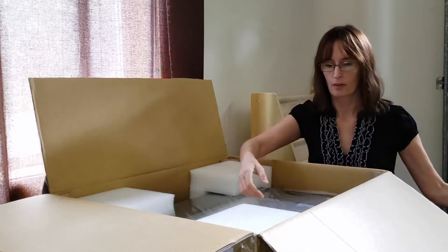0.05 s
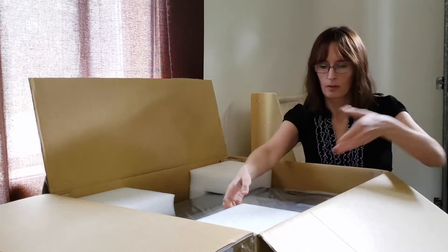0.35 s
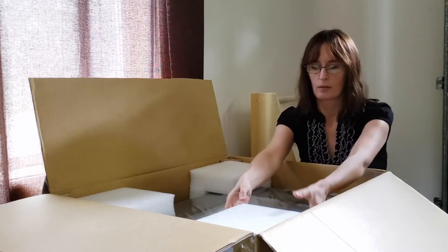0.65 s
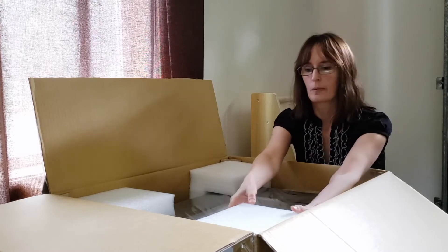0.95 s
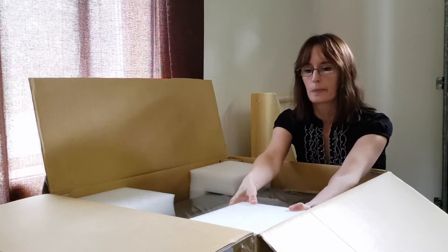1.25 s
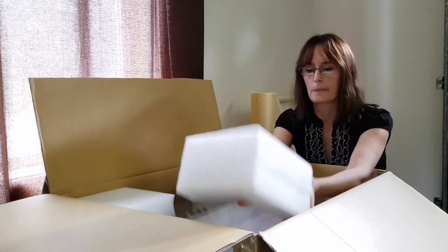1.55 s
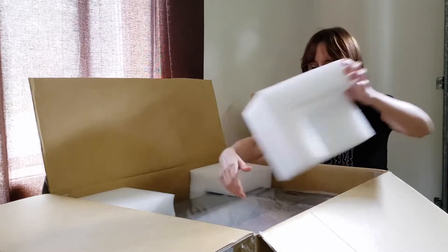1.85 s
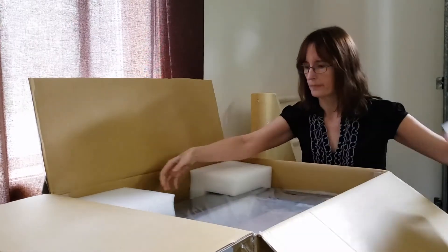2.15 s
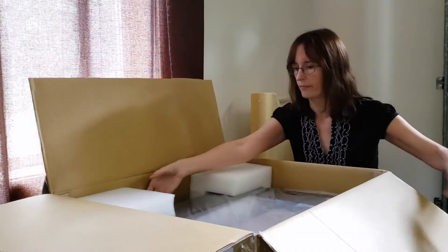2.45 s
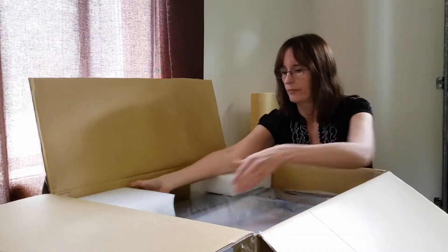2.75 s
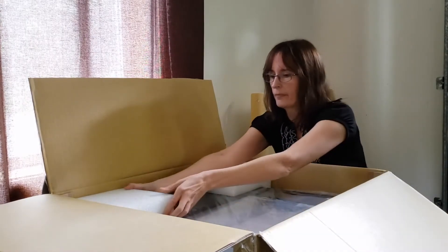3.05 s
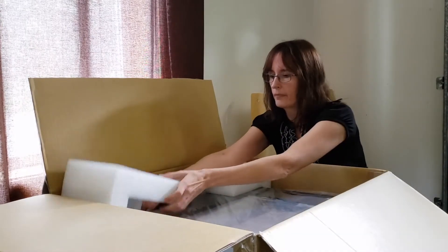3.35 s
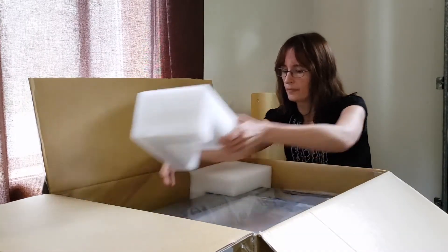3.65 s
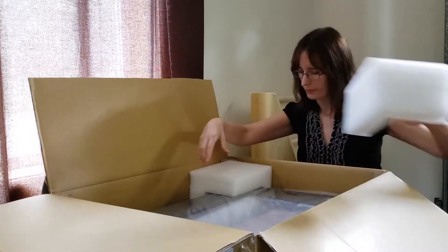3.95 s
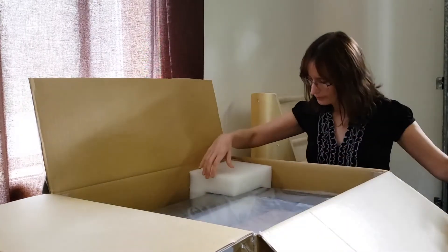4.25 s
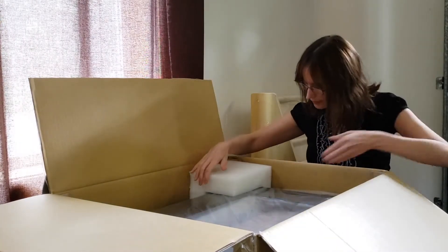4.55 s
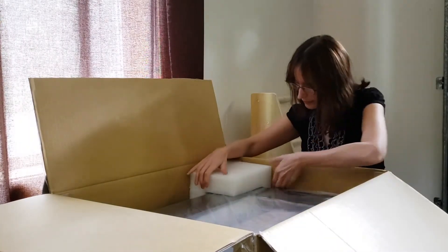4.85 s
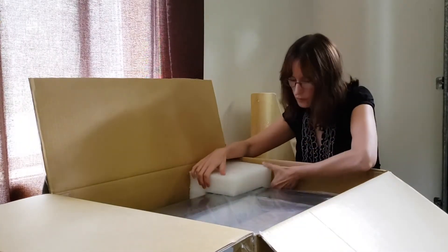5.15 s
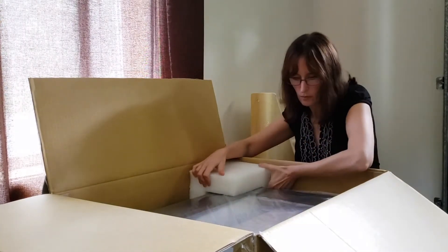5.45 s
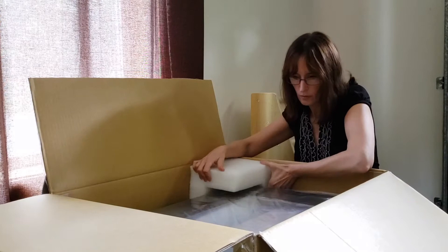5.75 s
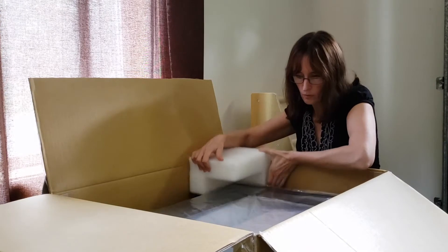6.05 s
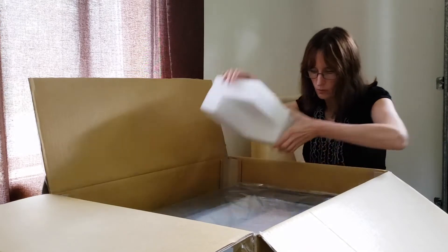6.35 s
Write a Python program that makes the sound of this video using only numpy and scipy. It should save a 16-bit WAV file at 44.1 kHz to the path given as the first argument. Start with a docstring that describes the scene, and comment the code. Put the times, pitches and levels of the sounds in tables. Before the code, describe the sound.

In a small room, a light block lands with a few dull thumps. Then, close to the microphones, foam scrapes along cardboard and comes loose with a hollow boom, followed by another thud on the floor. A second rasping pull leads to a run of soft knocks, scuffs and bounces, and a third stretch of rubbing ends it. Faint hand brushes and a low room drone lie underneath.

```python
"""Unpacking foam from a cardboard box

A small room, heard close to a big box through a pair of closely spaced microphones. Foam blocks are worked
out in a few strokes a pull: a dense crackle of tiny slips along the cardboard, with short scuffs where the
foam catches. Blocks land and bounce on the floor with dull thumps, and the box panels boom and rumble.
Behind it all lies the room tone, a faint drone and hiss."""
import sys
import numpy as np
from scipy import signal
from scipy.fft import rfft, irfft
from scipy.io import wavfile
from scipy.ndimage import uniform_filter1d

SR = 44100
rng = np.random.default_rng(int(sys.argv[2]) if len(sys.argv) > 2 else 0)


def wav_out(sig):
    """Save sig, one row per channel (or a flat mono array), as 16-bit PCM at SR to the path in sys.argv[1]."""
    wavfile.write(sys.argv[1], SR, np.round(np.clip(np.atleast_2d(sig).T, -1, 1) * 32767).astype(np.int16))


N = 291192
TIME = np.arange(N) / SR

# Levels in the tables are relative: each source sets its own gain in the mix.
# rubbing strokes, foam along cardboard and two light, fizzy brushes of a hand: start/s, rise/s, hold/s,
# t60/s, level/dB, body/dB re level, fizz/dB re level, body f/Hz, rasp f/Hz
RUBBING_STROKES = [ (0.0, 0.00078, 0.0024, 0.15, -29, -12.5, -5.5, 726, 2400),
                   (0.52, 0.023, 0.046, .2, -48.5, 3, -5, 520, 2010),
                   (0.848, 0.027, 0.018, 0.34, -38.5, 4, -3.5, 716, 1400),
                   (1.004, .03, .01, 0.17, -48, -19, -7, 440, 2000),
                   (1.156, 0.037, 0.087, 0.29, -20.5, -6, -14, 845, 1630),
                   (1.235, .065, .02, 0.32, -17.5, -6.5, -10, 840, 2050),
                   (1.316, 0.036, 0.025, 0.24, -18, -13.5, -9.5, 860, 2500),
                   (1.414, 0.025, 0.0089, 0.26, -21.5, -6.5, -6, 885, 1720),
                   (1.546, 0.039, 0.01, 0.15, -33, -11, -1.5, 900, 1900),
                   (2.292, 0.043, 0.0036, 0.28, -38, 1, 9, 1030, 1910),
                   (3.076, .022, 0.025, 0.45, -22, -1, -7, 910, 2000),
                   (3.147, 0.043, 0.064, 0.33, -27.5, -5, 0, 780, 1790),
                   (3.239, 0.034, 0.015, 0.43, -23.5, -5, -4.5, 920, 1800),
                   (3.431, 0.018, 0.0055, 0.28, -28.5, -2.5, -5.5, 680, 2270),
                   (3.476, 0.032, 0.012, 0.34, -30, -1, -1.5, 910, 1600),
                   (4.061, 0.076, 0.039, 0.23, -38, -0.5, 5, 820, 2730),
                   (5.588, 0.068, 0.05, 0.34, -22.5, 0.5, -5.5, 945, 1670),
                   (5.765, 0.1, 0.093, .3, -33.5, 1, -3, 850, 1550),
                   (5.863, 0.098, 0.027, .3, -18.5, -3, -6.5, 945, 1850),
                   (5.974, 0.032, 0.041, 0.38, -18, -2.5, -5, 620, 1810),
                   (6.081, 0.032, 0.011, 0.24, -21.5, -10, 1, 990, 1860),
                   (6.272, 0.03, 0.061, 0.32, -32, -9.5, 0.5, 960, 1950),
                   (6.332, 0.025, 0.0037, 0.18, -28, -3, 0, 970, 2700)]
# light brushes of hands and sleeves: middle t/s, length/s, level/dB
HAND_BRUSHES = [(0.72, 0.57, -59), (1.07, 0.39, -51.5), (2.24, 0.14, -48), (2.69, 0.23, -48),
                (3.02, .17, -47), (3.89, 0.061, -49.5), (3.98, 0.065, -48.5), (4.31, 0.25, -56.5),
                (4.49, 0.16, -53.5), (5.5, 0.17, -56.5), (5.6, .08, -48), (6.59, 0.14, -53.5)]
# spectrum of foam on cardboard: f/Hz, level/dB
FOAM_SPECTRUM = [(150, -13.5), (250, -8), (436, -6.5), (528, -6), (566, -4.5), (845, -1.5), (1470, -4),
                 (1670, -5.5), (2050, -7), (6820, -12.5), (7840, -10.5), (9010, -18.5), (11500, -16),
                 (15200, -21.5), (16000, -24)]
# sliding foam catches and lets go, and a hand brushes past at 2.33 s: t/s, level/dB, t60/s, tilt/(dB per
# octave), ring f/Hz, ring/dB
CATCHES = [(0.258, -13.5, 0.044, -3.5, 1010, 2), (0.265, -8, 0.029, -4, 3900, 16),
           (0.274, -17.5, 0.024, -7, 2300, 7), (1.249, -17.5, 0.052, -1.5, 6400, 10),
           (1.442, -16, 0.069, 1.5, 2200, 1), (2.134, -38, 0.025, 0.5, 5100, 6),
           (2.33, -40.5, 0.17, 0, 1010, 19), (3.076, -23, 0.094, 2, 5040, -4),
           (3.085, -14, 0.14, 2.2, 3000, 3.5), (3.268, -25.5, .15, 1, 2400, 7),
           (3.362, -17.5, 0.067, -1, 1730, 0), (3.575, -23.5, 0.11, 1.5, 2600, 2.5),
           (3.945, -34, .057, 7, 9250, 12), (3.971, -39, 0.15, -6, 967, 28),
           (4.53, -28.5, 0.046, 1.5, 6700, 8.5), (4.565, -13.5, 0.033, 3.5, 3670, 14),
           (4.706, -24, 0.35, 1, 1390, 15), (4.921, -17.5, 0.076, -2.5, 3000, 3),
           (5.209, -41.5, 0.72, -1.5, 2440, -1), (5.8, -26, .02, 0, 5000, -3),
           (6.128, -25, .04, 6, 2600, 3), (6.280, -25.5, .045, 1, 3000, 0),
           (6.362, -21, 0.042, 7, 3630, 17)]
# blocks and hands strike floor and box: t/s, slap level/dB, slap f/Hz, rise/cycles, room/dB re slap,
# low push level/dB, scuff level/dB, scuff t60/s, scuff tilt/(dB per octave)
BLOWS = [ (0.264, -10, 450, 0.27, 3, -9.5, -10, 0.038, -2), (0.279, 0, 497, 0.6, 6.5, -11.5, -30, 0.14, -9),
         (0.368, -11.5, 473, 0.89, -11, -38, -37, 0.11, -7),
         (0.455, -27, 440, 0.56, 10.5, -21, -34, 0.15, -2.5), (0.606, -13, 287, 0.39, 4, -33, -39.5, .2, 1),
         (0.645, -24, 290, 0.86, -3, -40, -46, .1, 1), (0.970, -29.5, 350, 0.7, 12, -37, -30, 0.17, -1),
         (1.026, -31, 334, 0.76, 9.5, -37, -51, .1, -1), (1.304, -21, 200, 0.29, 5, -36, -33, .1, -1),
         (1.617, -21, 334, 0.46, 8, -10.5, -22, 0.18, 0.5), (1.638, -18, 454, 0.88, 3, -6.5, -37, 0.18, -4),
         (2.744, -6, 527, 0.2, 10.5, -9.5, -16, 0.039, 1), (2.754, -5, 207, 0.42, -5, -19, -26, 0.38, -3),
         (2.773, 0.5, 158, 0.48, -7, -29, -43, .1, -2), (3.611, -14, 602, 3.2, 6, -18, -18, 0.16, -0.2),
         (3.686, -11.5, 540, 0.72, 3, -9, -23, 0.18, -1),
         (3.736, -12, 426, 1.3, 3.5, -25, -36.5, 0.54, 1.5),
         (3.764, -10.5, 477, .5, 6.5, -33, -42, 0.092, -1), (3.780, -8, 197, 0.44, -3.5, -33, -45, .1, -1),
         (4.567, -19.5, 382, 0.66, 10, -21, -9.5, 0.12, -0.5),
         (4.579, -17, 340, 0.37, -7, -18, -15, 0.15, -3), (4.627, 0.5, 620, 0.95, -3.5, 1, -41, 0.09, -15),
         (4.690, -8, 380, 0.31, 4.5, -23, -15, .09, -2),
         (4.787, -12.5, 350, 0.27, 6.5, -34, -21.5, 0.18, -2.5),
         (4.876, -28, 450, .4, 2, -27, -27, .27, -1), (4.914, -18, 530, 0.49, 6, -11, -20, 0.24, -3),
         (5.065, -20.5, 470, 0.31, 15, -28, -28, 0.25, -0.5),
         (5.116, -0.5, 470, 0.6, 6, -9, -23, 0.047, -6)]
# a box wall springs back as a block comes free: t/s, level/dB
WALL_BOOMS = [(1.658, -5.5), (1.683, -6.5), (3.101, -20), (3.175, -18), (3.265, -15), (3.299, -20),
              (3.615, -19.5), (5.247, -36)]
# resonances of the cardboard panels: f/Hz, gain/dB, t60/s
PANEL_MODES = [(76.8, 6, 0.31), (125.8, 3, 0.28), (191.8, 3.5, 0.27), (423, -2, 0.62), (587, -1, 0.16),
               (1050, 2, 0.15)]
# shoves that sway the box walls: middle t/s, length/s, level/dB
WALL_SHOVES = [(1.08, 0.14, -36), (1.35, 0.3, -36), (1.82, .15, -29.5), (2.02, .22, -40.5),
               (2.33, 0.29, -44.5), (2.82, 0.091, -20.5), (3.16, .15, -24), (3.29, 0.081, -26.5),
               (3.65, 0.045, -24), (3.81, 0.092, -25.5), (4.39, .07, -38.5), (4.68, 0.074, -29),
               (4.94, 0.088, -28), (6.34, .12, -32)]
# spectrum of the swaying walls: f/Hz, level/dB
SWAY_SPECTRUM = [(20, -39), (34, -11), (64, 11), (80, -2.5), (150, -14), (179, -15), (219, -33), (260, -18),
                 (340, -50), (570, -120)]
# reverberation of the small room: f/Hz, t60/s
ROOM_DECAY = [(60, 0.21), (160, 0.45), (450, 0.4), (1100, 0.33), (3000, 0.31), (8000, 0.25), (16000, 0.37)]
# likeness of the room sound at the left and right microphones: f/Hz, correlation
MIC_CORRELATION = [(60, 0.31), (180, 0.91), (350, 0.75), (700, 0.42), (1400, 0), (16000, 0)]
# spectrum of the room's hiss: f/Hz, level/dB
HISS_SPECTRUM = [(15, -32), (25, -16.5), (84, -10), (145, -14.5), (236, -20.5), (476, -22.5), (575, -24.5),
                 (1230, -31.5), (2350, -32.5), (2550, -30), (5570, -37), (7920, -28.5), (9320, -39),
                 (11300, -32), (16000, -32)]
# bands of the room's low drone: f/Hz, width/Hz, level/dB
DRONE_BANDS = [(53.7, 6.7, -48.5), (119.2, 2.2, -52), (358, 1.7, -66)]

RASP_GLIDE_OCTAVES = 0.3  # the rasp climbs to its pitch as a stroke gathers speed
BRUSH_BODY_DB, BRUSH_FIZZ_DB, BRUSH_BODY_HZ, BRUSH_RASP_HZ = -1.5, 7.5, 590, 2250
CATCH_RISE_S, BLOW_RISE_S, BLOW_RING_HZ, BLOW_RING_DB = 0.0014, 0.0022, 2070, -1
PUSH_PITCH_RATIO, PUSH_CYCLES, PUSH_ROOM_DB = 0.38, 0.51, 0.5  # the panel gives way under each slap
BOOM_HZ, BOOM_CYCLES, BOOM_ROOM_DB = 85.3, 0.77, -10
THUMP_LOW_CUT_HZ = 26  # the thumps lose their deepest bass below this
HISS_DB, BAND_LIMIT_HZ = -46.5, 16050


def foam_slides():
    """Slips rasp through the foam, close up; cardboard adds hollow body, light contact adds fizz."""
    grain = slips(size=N, per_s=1300, spread_db=4.0, hiss_gain=0.8)
    grain = colour(grain, lambda f: amp(read(FOAM_SPECTRUM, f)))
    below = lambda f, edge_hz: 1 / (1 + (f / edge_hz) ** 8)
    rasp_gain, body_gain, fizz_gain, body_hz, rasp_hz = rubbing()
    body = colour(grain, lambda f: below(f, edge_hz=1380) - 0.25 * below(f, edge_hz=240))
    body = unit(0.45 * body + resonate(body, body_hz, width_hz=790))
    rasp = colour(grain, lambda f: below(f, edge_hz=5400) - below(f, edge_hz=1370))
    rasp = unit(2.03 * rasp + resonate(rasp, rasp_hz, width_hz=2100))
    fizz = unit(colour(grain, lambda f: 1 - below(f, edge_hz=5070)))
    direct = amp(-1) * body * body_gain + amp(-1.5) * rasp * rasp_gain + amp(-1) * fizz * fizz_gain
    return amp(-4.5) * direct + amp(0.5) * moving_echoes(direct, near_db=14, near_t60=0.13, count=14)


def rubbing():
    """Strokes grip, speed up and let go among light brushes: gain and pitch curves for the slides."""
    t = np.arange(SR) / SR
    power = swells(HAND_BRUSHES) ** 2
    body_power, fizz_power = amp(BRUSH_BODY_DB) ** 2 * power, amp(BRUSH_FIZZ_DB) ** 2 * power
    # pitches are weighted by power, so the stronger stroke leads
    body_sum, rasp_sum = BRUSH_BODY_HZ * power, BRUSH_RASP_HZ * power
    for s, rise, hold, t60, db, body_db, fizz_db, body_hz, rasp_hz in RUBBING_STROKES:
        grip = np.sin(np.pi / 2 * np.minimum(t / rise, 1)) ** 2
        force = grip * amp(db - 60 * np.maximum(t - rise - hold, 0) / t60)
        speed = np.minimum(t / (rise + hold), 1)
        add(power, s, force ** 2)
        add(body_power, s, (force * amp(body_db)) ** 2)
        add(fizz_power, s, (force * amp(fizz_db)) ** 2)
        add(body_sum, s, force ** 2 * body_hz)
        add(rasp_sum, s, force ** 2 * rasp_hz * 2 ** (RASP_GLIDE_OCTAVES * (speed - 1)))
    return np.sqrt(power), np.sqrt(body_power), np.sqrt(fizz_power), body_sum / power, rasp_sum / power


def slips(size, per_s, spread_db, hiss_gain):
    """Foam cells snap free one by one, in clumps, over a smooth hiss of the smallest ones."""
    snapping = rng.random(size) < per_s / SR
    strength = np.minimum(rng.exponential(1, size), 3.3)
    sign, hiss, clump = rng.standard_normal((3, size))
    snaps = np.sign(sign) * snapping * amp(spread_db * strength)
    clump_db = 1.8 * unit(colour(clump, lambda f: (f / (f + 40)) ** 2 / (1 + (f / 140) ** 2)))
    return unit((unit(snaps) + hiss_gain * hiss) * amp(clump_db))


def scuffs():
    """Each catch and blow sheds a burst of slips, coloured by one ring, that swells fast and dies."""
    direct, t = np.zeros(N), np.arange(SR // 3) / SR
    bursts = [(*row, CATCH_RISE_S) for row in CATCHES]
    for s, *_, db, t60, tilt_db in BLOWS:
        bursts.append((s, db, t60, tilt_db, BLOW_RING_HZ, BLOW_RING_DB, BLOW_RISE_S))
    for s, db, t60, tilt_db, ring_hz, ring_db, rise in bursts:
        ring = lambda f: ring_db * np.exp(-(np.log2((f + 1) / ring_hz) / 0.43) ** 2)
        tilt = lambda f: tilt_db * np.log2((f + 200) / 2500)
        grain = slips(size=len(t), per_s=2500, spread_db=1.5, hiss_gain=0.85)
        grain = colour(grain, lambda f: amp(read(FOAM_SPECTRUM, f) + tilt(f) + ring(f)))
        bite = 1 + 0.63 * np.exp(-t / 0.0015)  # the first slip is the hardest
        envelope = np.minimum(t / rise, 1) * amp(db - 60 * np.maximum(t - rise, 0) / t60)
        add(direct, s, unit(grain) * bite * envelope)
    return amp(-5.5) * direct + amp(2) * moving_echoes(direct, near_db=20, near_t60=0.02, count=9)


def thumps():
    """A soft block slaps and pushes the air, or a wall springs back; box and room carry it on."""
    direct, room, t = np.zeros(N), np.zeros((2, N)), np.arange(SR // 6) / SR
    pulses = [(s, db, BOOM_HZ, BOOM_CYCLES, BOOM_ROOM_DB) for s, db in WALL_BOOMS]
    for s, db, hz, cycles, room_db, push_db, *_ in BLOWS:
        pulses.append((s, db, hz, cycles, room_db))
        pulses.append((s, push_db, hz * PUSH_PITCH_RATIO, PUSH_CYCLES, PUSH_ROOM_DB))
    for s, db, hz, cycles, room_db in pulses:
        age = t * hz / cycles  # 1 at the envelope's peak
        pulse = -amp(db) * (age * np.exp(1 - age)) ** 2 * np.sin(2 * np.pi * hz * t)
        tail = echoes(pulse, near_db=1, near_t60=0.15)
        add(direct, s, pulse)
        add(room, s, amp(room_db) * tail * np.linalg.norm(pulse) / np.linalg.norm(tail[0]))
    low_cut = lambda f: f ** 2 / (f ** 2 + THUMP_LOW_CUT_HZ ** 2)
    return colour(direct + room + panel_ring(direct), low_cut)


def panel_ring(x):
    """The cardboard panels ring along with whatever shakes them."""
    t = np.arange(SR // 2) / SR
    ring = np.zeros(len(t))
    for hz, db, t60 in PANEL_MODES:
        scale = 2 * np.log(1000) / (t60 * SR)  # makes db the gain at resonance
        ring += scale * amp(db - 60 * t / t60) * np.cos(2 * np.pi * hz * t)
    return signal.fftconvolve(x, ring)[:N]


def wall_sway():
    """Uneven drag flexes the big box walls: a soft rumble that swells with each shove."""
    drag = colour(rng.standard_normal(N), lambda f: amp(read(SWAY_SPECTRUM, f)))
    drag /= np.sqrt(uniform_filter1d(unit(drag) ** 2, size=3000) + 0.05)  # evens out the level
    return amp(-1) * unit(drag) * swells(WALL_SHOVES)


def moving_echoes(x, near_db, near_t60, count):
    """A moving block keeps changing its paths to the walls: echo patterns fade into one another."""
    place = TIME / 0.016  # the next pattern every 16 ms
    room = np.zeros((2, N))
    for k in range(count):
        away = abs((place - k + 1) % count - 1)
        fade = np.cos(np.pi / 2 * np.minimum(away, 1))
        room += echoes(x * fade, near_db, near_t60)[:, :N]
    return room


def echoes(x, near_db, near_t60):
    """Echoes at the microphones: a quick cluster from nearby surfaces, then the room's tail."""
    hz, t, spectrum = signal.stft(diffuse(size=SR // 2), SR, nperseg=256)
    far = amp(-60 * t / read(ROOM_DECAY, hz)[:, None])
    near = amp(near_db - 60 * t / near_t60)
    tail = signal.istft(spectrum * np.hypot(far, near), SR, nperseg=256)[1]
    tail *= 1 - np.exp(-(np.arange(tail.shape[1]) / SR / 0.0038) ** 2)  # echoes take a few ms to build
    return signal.fftconvolve(x[None], tail / np.linalg.norm(tail[0]), axes=1)


def room_tone():
    """Steady hiss from all round, and a low centred drone that swells and fades in narrow bands."""
    hiss = unit(colour(diffuse(size=N), lambda f: amp(read(HISS_SPECTRUM, f))))
    noise = rng.standard_normal(N)
    drone = sum(amp(db) * unit(colour(noise, lambda f: np.exp(-((f - hz) / width) ** 2)))
                for hz, width, db in DRONE_BANDS)
    return amp(HISS_DB) * hiss + drone


def diffuse(size):
    """Noise from all sides at two close microphones: alike in the bass, unrelated in the treble."""
    mid, side = rng.standard_normal((2, size))
    mid = colour(mid, lambda f: np.sqrt((1 + read(MIC_CORRELATION, f)) / 2))
    side = colour(side, lambda f: np.sqrt((1 - read(MIC_CORRELATION, f)) / 2))
    return np.array([mid + side, mid - side])


def swells(rows):
    """Gain over time of bell-shaped swells, each as wide as its length at half height."""
    power = sum(amp(db) ** 2 * 0.5 ** np.minimum(2 * (2 * (TIME - s) / length) ** 2, 60)
                for s, length, db in rows)
    return np.sqrt(power)


def resonate(x, hz, width_hz):
    """A resonance of gain about 1 that follows the curve hz."""
    turn = np.exp(2j * np.pi * np.cumsum(hz) / SR)
    pole = np.exp(-np.pi * width_hz / SR)
    return 2 * (turn * signal.lfilter([1 - pole], [1, -pole], x / turn)).real


def colour(x, gain):
    """Filters x by a gain given as a function of frequency."""
    return irfft(rfft(x) * gain(np.fft.rfftfreq(x.shape[-1], 1 / SR)), x.shape[-1])


def read(points, hz):
    """Reads a table on a log-frequency axis."""
    f, value = np.transpose(points)
    return np.interp(np.log(hz + 1), np.log(f + 1), value)


def add(mix, s, sound):
    """Mixes a sound in at s seconds."""
    part = mix[..., max(round(s * SR), 0):][..., :sound.shape[-1]]
    part += sound[..., :part.shape[-1]]


def amp(db):
    """Decibels to gain."""
    return 10 ** (np.asarray(db) / 20)


def unit(x):
    """Scales to rms 1."""
    return x / np.sqrt(np.mean(x ** 2) + 1e-20)


def scene():
    """Foam and box in the centre, in front of the microphones, with the room around them."""
    return foam_slides() + scuffs() + thumps() + wall_sway() + room_tone()


def record(dry):
    """Behind the microphones, the loudest thumps round off at full scale and the top treble is cut."""
    rounded = dry / (1 + dry ** 8) ** (1 / 8)
    lowpass = signal.firwin(511, BAND_LIMIT_HZ, window=("kaiser", 9), fs=SR)
    return signal.oaconvolve(rounded, lowpass[None], "same")


dry = scene()
out = record(dry)
wav_out(out)
```